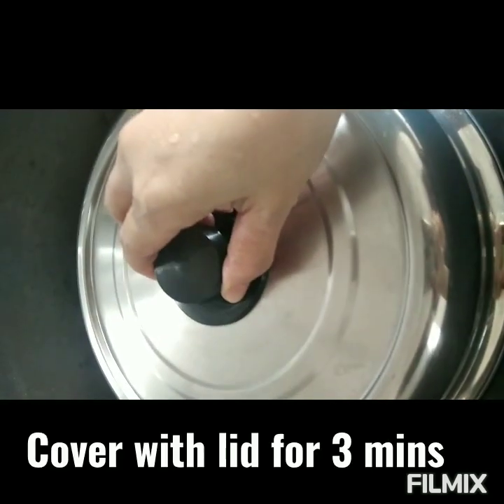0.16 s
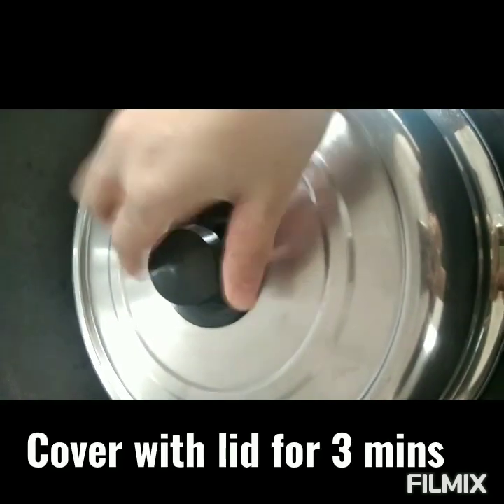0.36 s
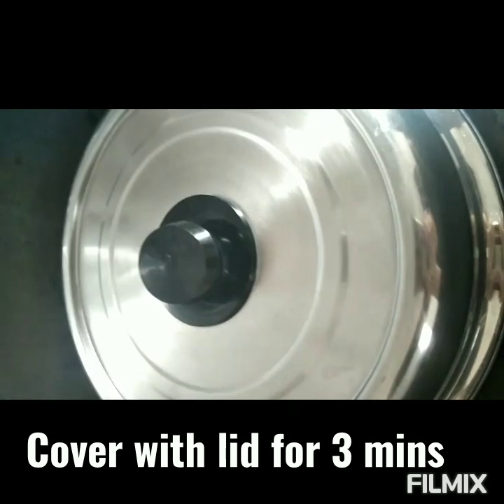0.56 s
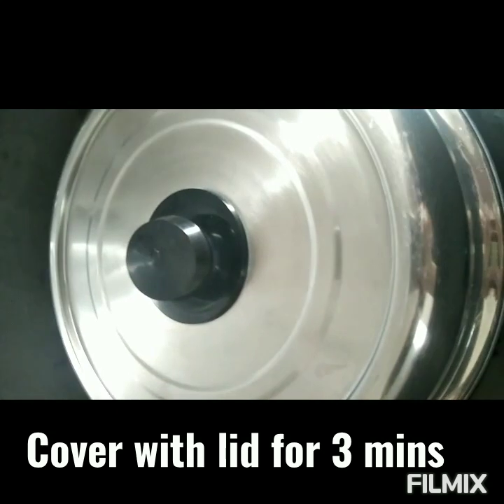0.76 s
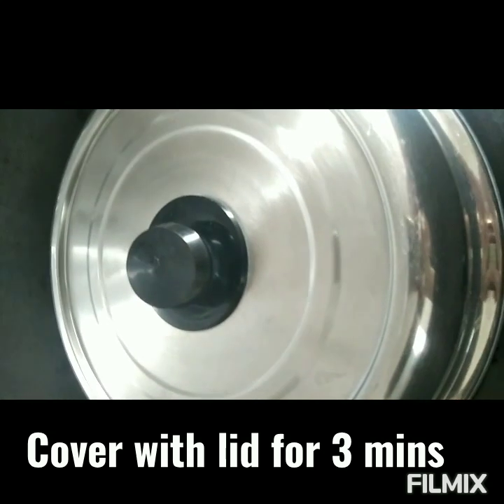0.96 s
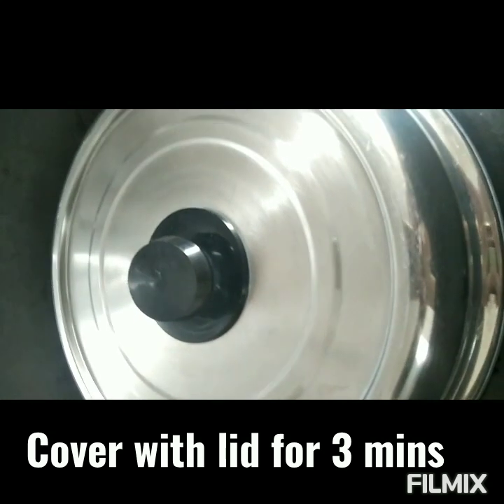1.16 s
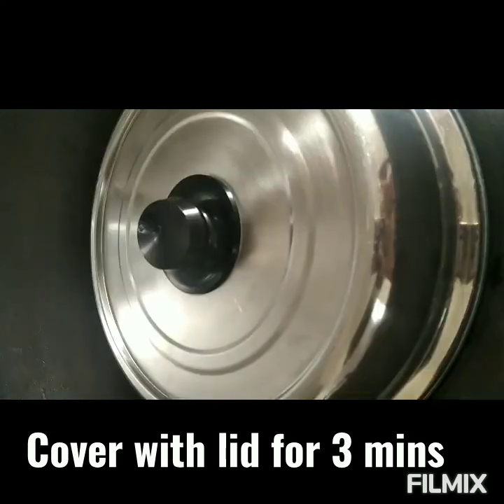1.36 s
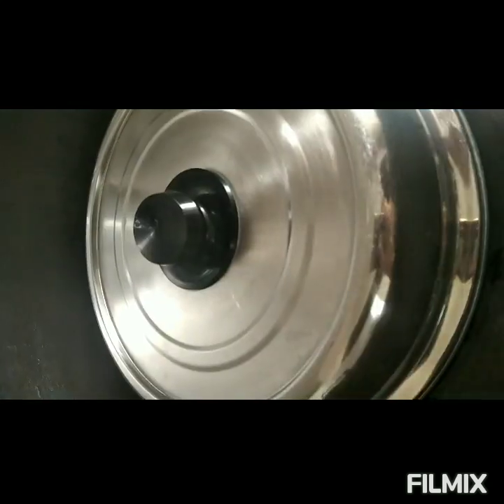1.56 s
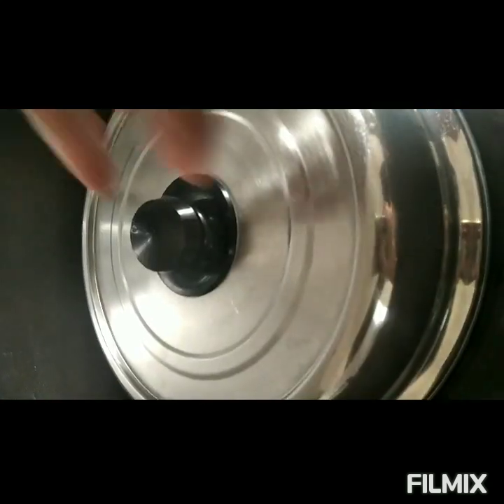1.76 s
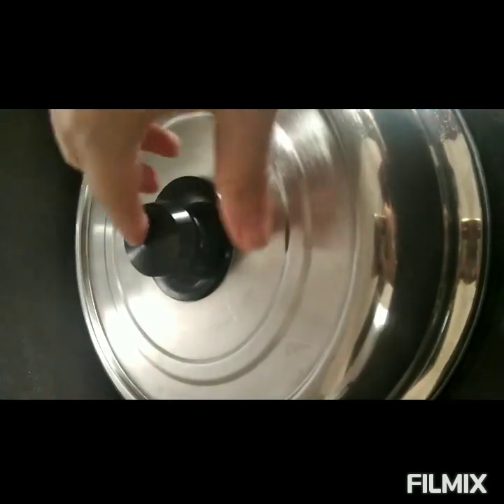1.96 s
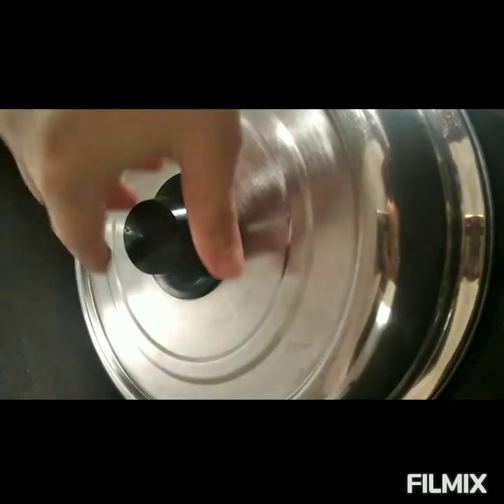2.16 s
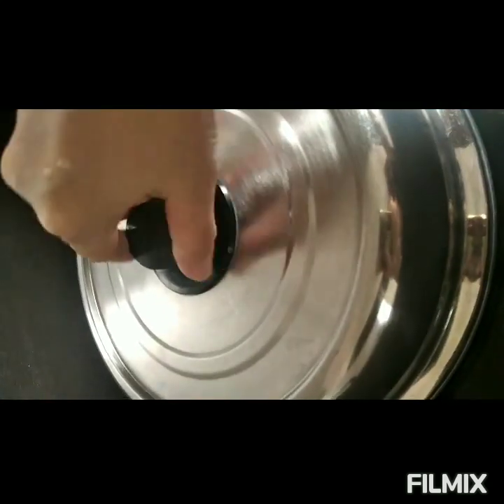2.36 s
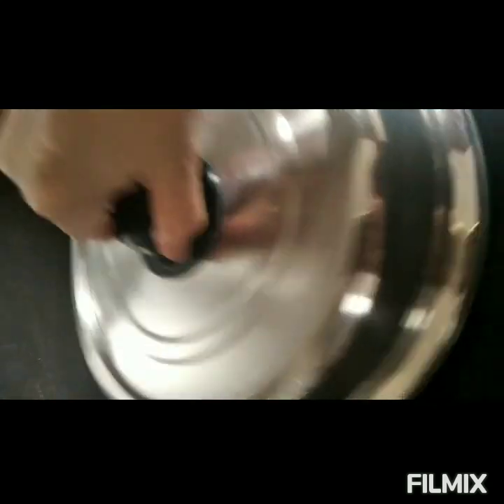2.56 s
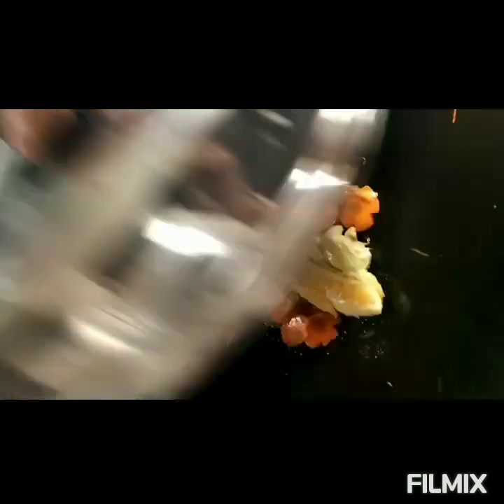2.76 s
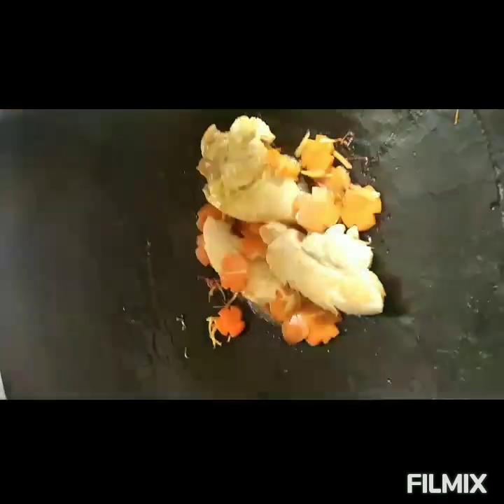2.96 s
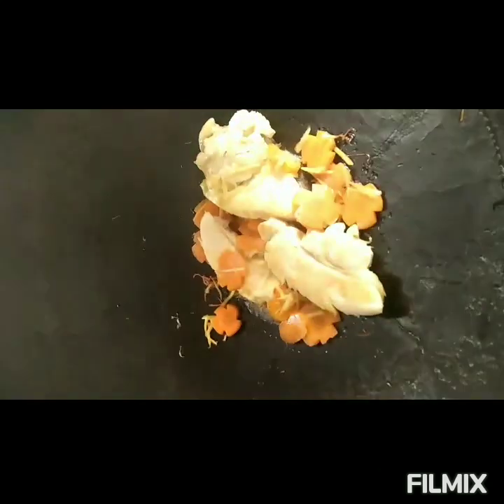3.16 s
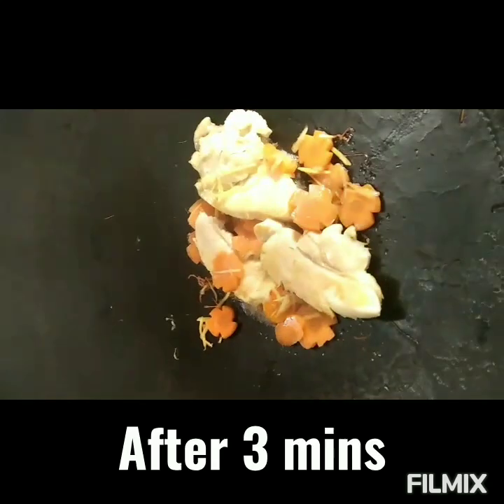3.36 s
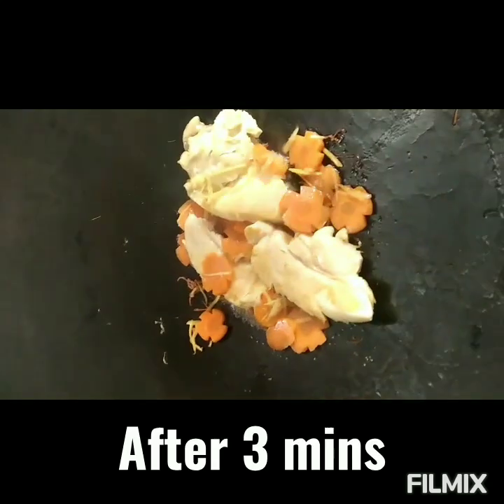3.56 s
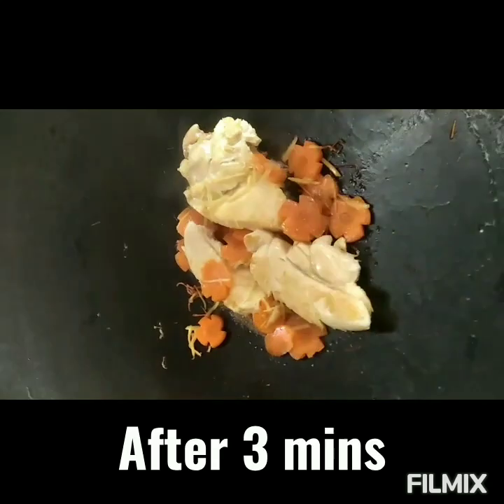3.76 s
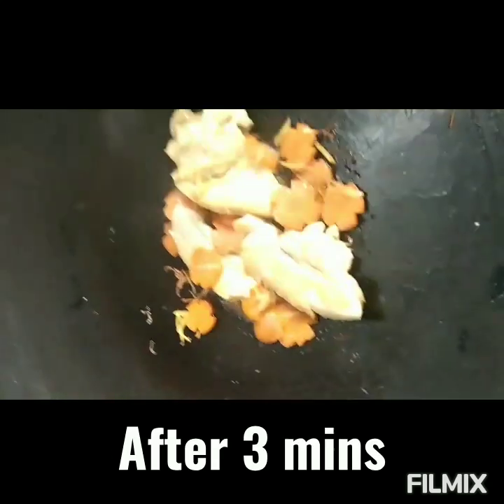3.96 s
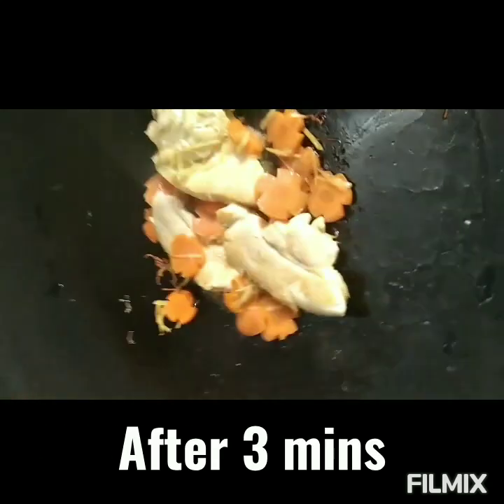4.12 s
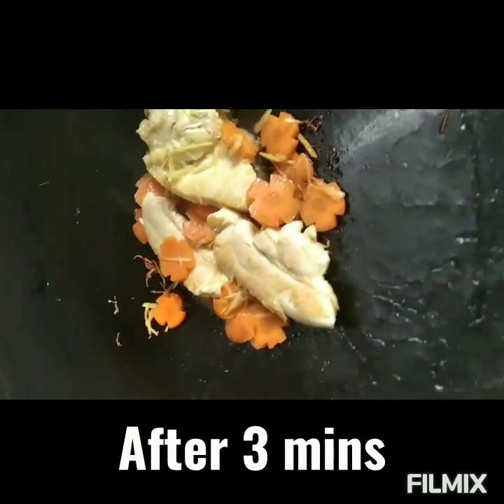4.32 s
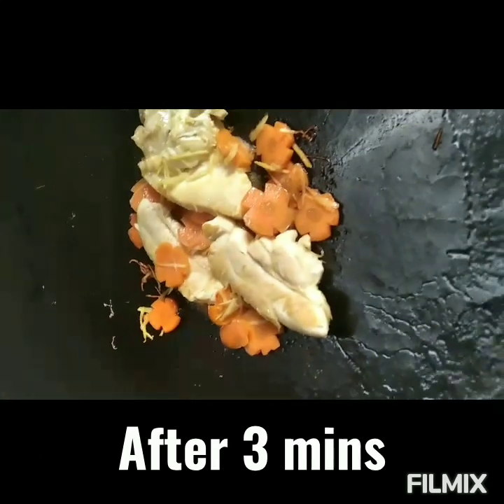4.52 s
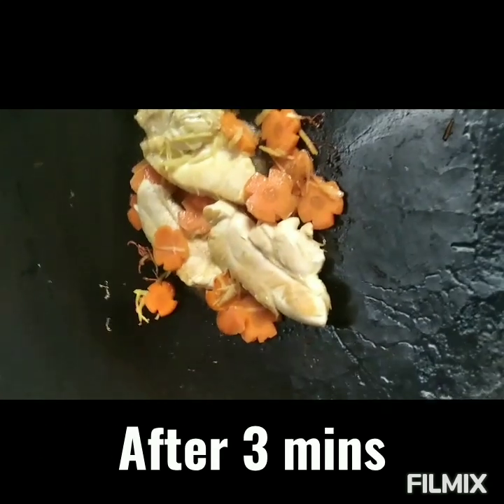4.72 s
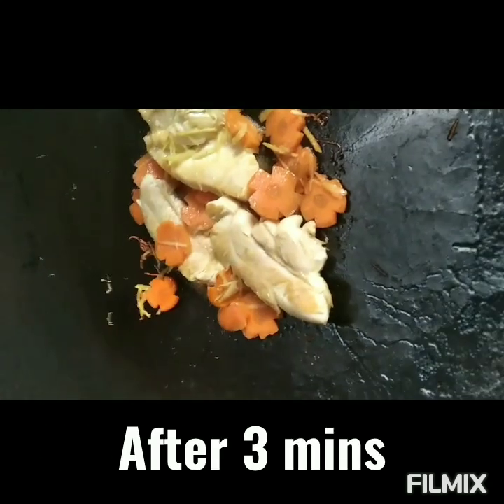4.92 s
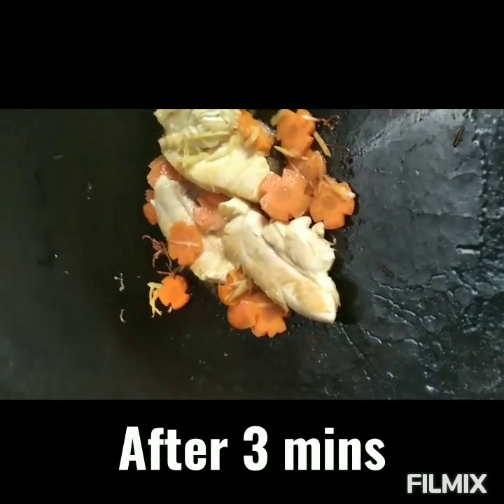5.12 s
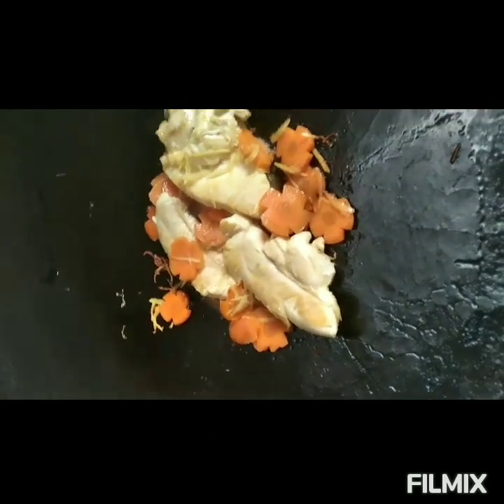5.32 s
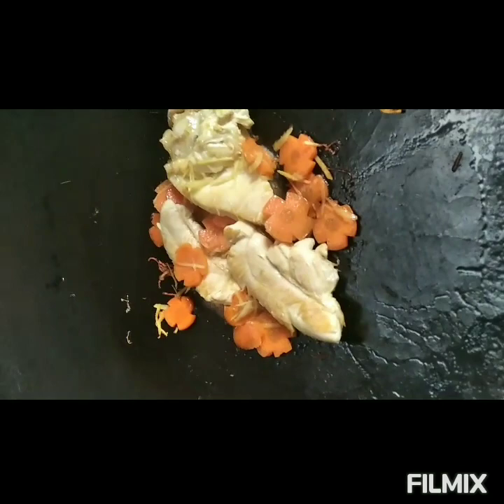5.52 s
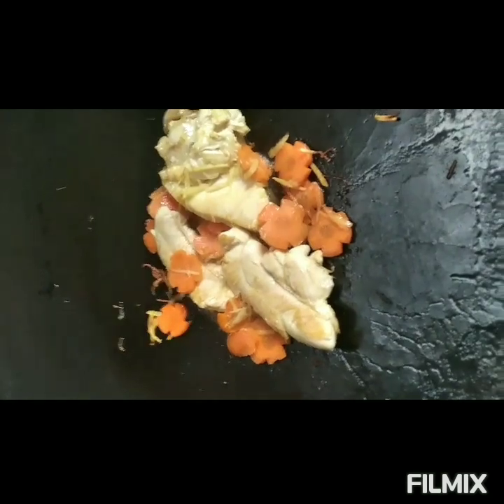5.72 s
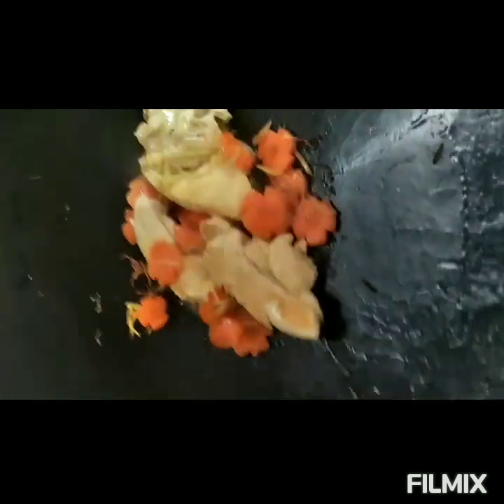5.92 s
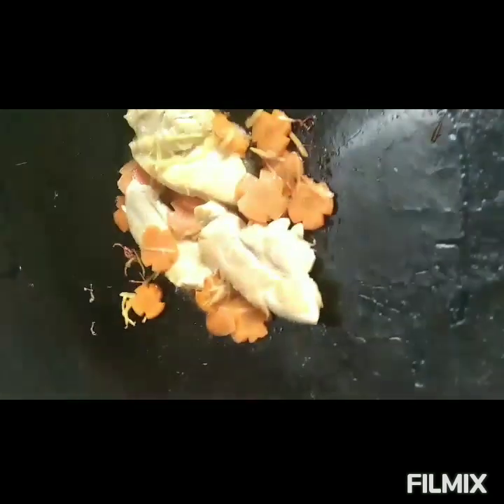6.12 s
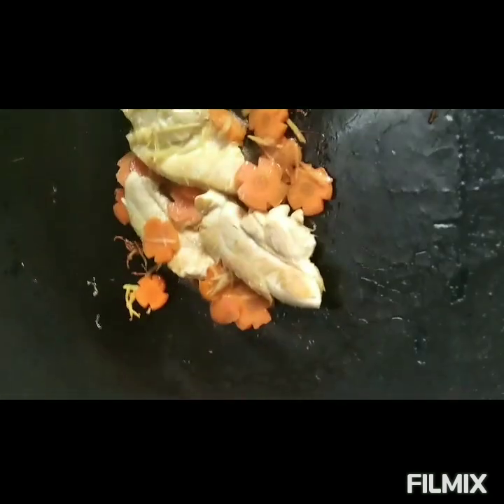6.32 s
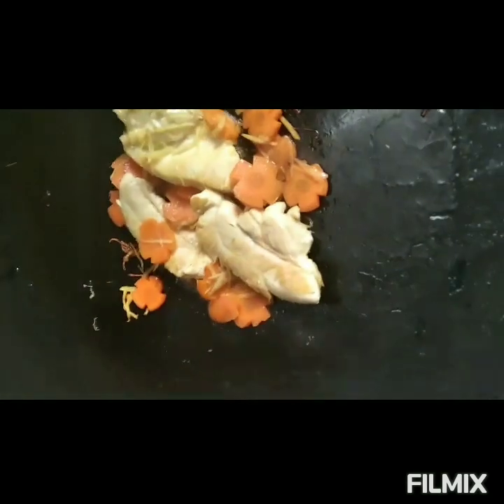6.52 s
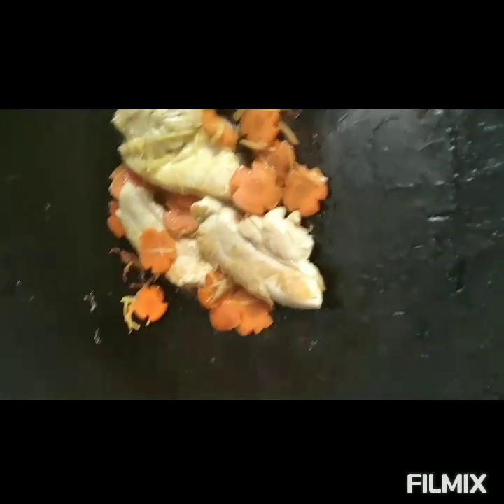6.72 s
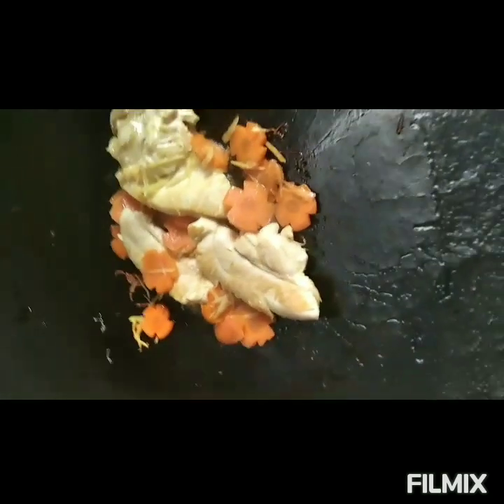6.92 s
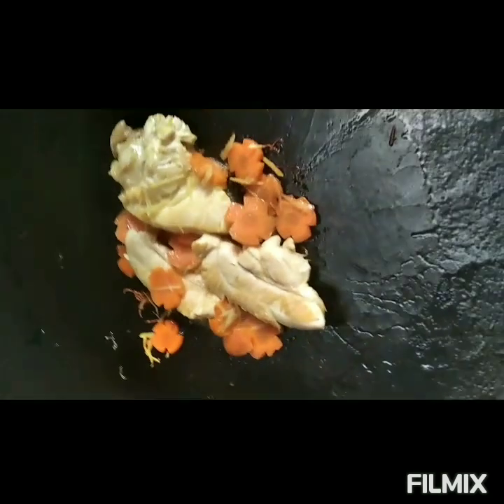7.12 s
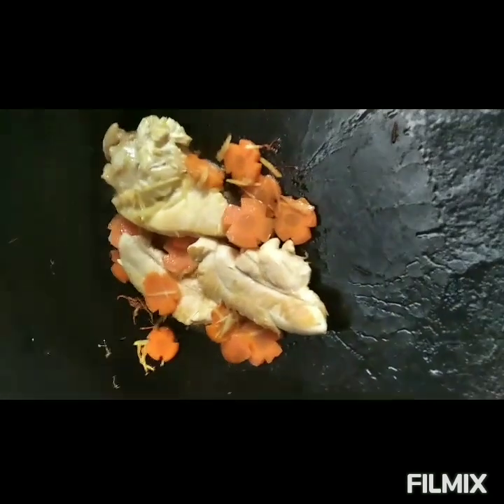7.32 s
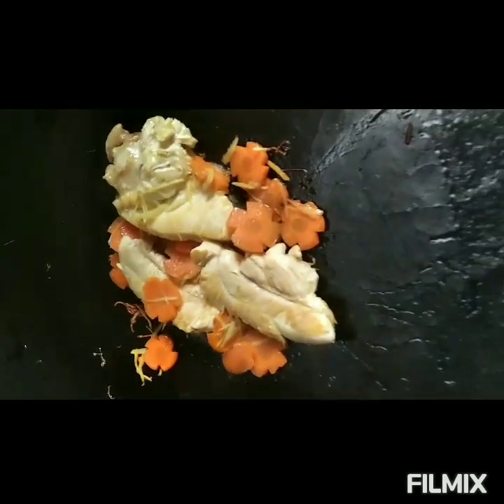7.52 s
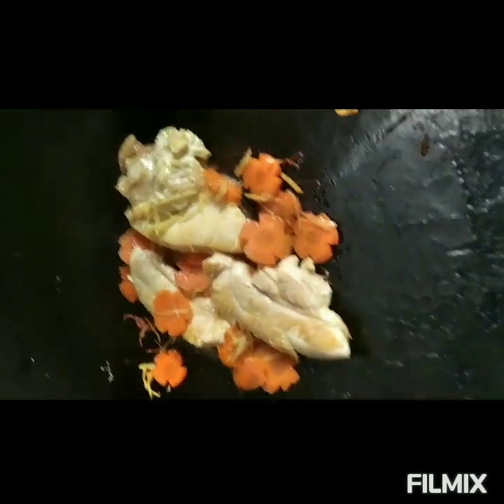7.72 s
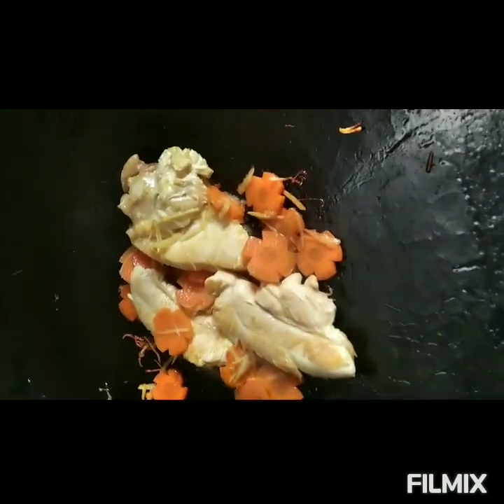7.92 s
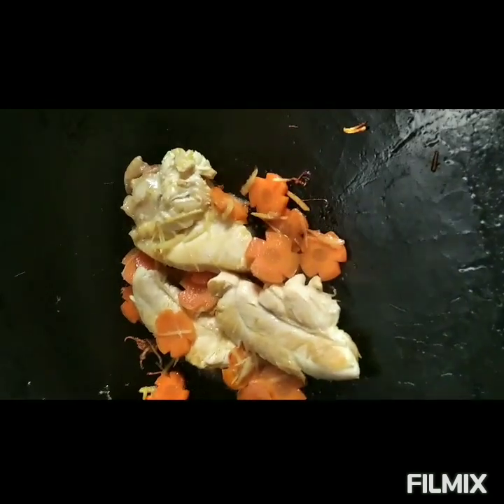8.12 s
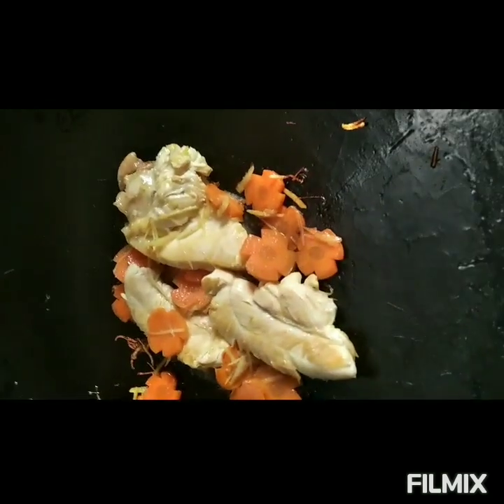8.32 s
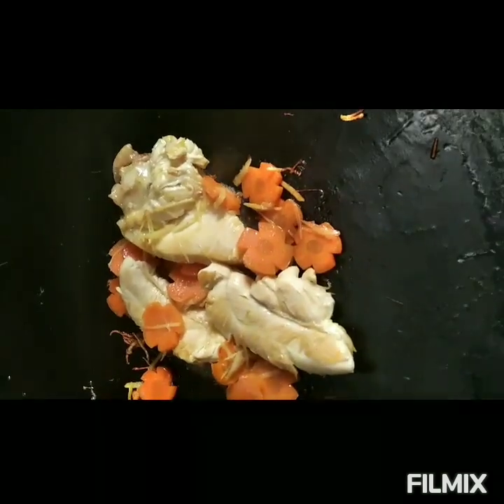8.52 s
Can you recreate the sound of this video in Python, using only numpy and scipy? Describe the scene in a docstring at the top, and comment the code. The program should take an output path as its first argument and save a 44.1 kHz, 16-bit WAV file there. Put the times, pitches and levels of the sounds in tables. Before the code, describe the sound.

Close stereo sound in a small kitchen, with a faint low rush and mains hum behind. From 0 s, food sizzles under a steel lid: hollow, resonant bubbling with leaking hiss, and a soft thump of fingers on the knob at 0.1 s. At about 1.3 s the covered sizzle abruptly changes colour, becoming quieter and duller. Around 2.55 s a hand thumps the knob and the lid lifts; the sizzle opens up bright and full, flaring as water hits oil, with sharp spits and a light knock until about 3.1 s. It eases into steady, crisp frying, with tiny taps at 5.3, 6.3 and 6.7 s and one spit near 5.8 s. At 7.16 s the lid is set down: a rapid metallic chatter on one edge, then the other by 7.27 s, ringing briefly. It slides with low drumming rubs and a scrape until 7.85 s, then a faint scrape and bump at 8.5 s, sizzling throughout.

```python
"""Lidded wok, opened

Chicken and carrots sizzle in a wok under a steel lid, whose knob a hand bumps; then the lid lifts,
water spits in the hot oil and the sizzle opens up. The lid is set down: it clatters, rings and slides.
Sizzle is random bubble bursts, coloured by spectra or by the resonances of the air under the lid.
Blows are damped noise bursts, low thuds and decaying modes; a low rush and a mains hum lie behind."""
import sys
import numpy as np
from scipy import signal
from scipy.fft import rfft, irfft, next_fast_len
from scipy.io import wavfile
from scipy.ndimage import uniform_filter1d, map_coordinates

SR = 44100
rng = np.random.default_rng(int(sys.argv[2]) if len(sys.argv) > 2 else 0)


def wav_out(sig):
    """Save sig, one row per channel (or a flat mono array), as 16-bit PCM at SR to the path in sys.argv[1]."""
    wavfile.write(sys.argv[1], SR, np.round(np.clip(np.atleast_2d(sig).T, -1, 1) * 32767).astype(np.int16))


N = 377937

LIFT_S = 2.556  # the lid leaves the wok
NEAR, FAR = 0, 1  # the two edges of the rim

# level difference of the wok's sound, left minus right: f/Hz, difference/dB
WOK_SIDE = [(300, 21), (600, -9), (800, -6), (1500, -2.5), (2100, 1), (3100, 8.5), (4600, 4), (5000, 2.5),
            (7600, -3), (8600, 2), (9300, 4.5), (11000, 3.5), (14000, 1.5)]
# level difference of the handling and the kitchen, left minus right: f/Hz, difference/dB
TABLE_SIDE = [(100, 12), (280, 13), (400, 7), (650, 3), (2300, 3.5), (4300, 0), (8000, -1), (14000, 1.5)]
# left-right coherence of knocks and modes: f/Hz, coherence (1 = identical)
ALIKE = [(100, 0.17), (300, 0.087), (630, 0.66), (1400, 0.2), (3000, 0.28)]
# dense ringing of the lid's steel, struck at the near and at the far edge: f/Hz, relative level/dB
SHIMMER = [
    [(700, -30), (1300, -3), (2300, 5), (3000, 3), (5000, 12), (7600, 12), (9500, 9), (11000, 2),
     (14400, 2)],
    [(700, -30), (1300, 2), (2300, 13), (3000, 16), (3700, 16.5), (5000, 7), (9500, 5), (11000, -10),
     (14400, -8)],
]


def amp(db):
    """The decibel law: a level in dB as an amplitude ratio."""
    return 10 ** (np.asarray(db) / 20)


def unit(x):
    """Normalisation to an rms amplitude of 1."""
    return x / np.sqrt(np.mean(x ** 2) + 1e-20)


def along(points, hz):
    """Linear interpolation of (f/Hz, value) points on a logarithmic frequency axis."""
    f, value = np.transpose(points)
    return np.interp(np.log(hz + 1), np.log(f), value)


def curves(rows):
    """Linear interpolation in time: one value per sample for each column after t/s."""
    t, *columns = np.transpose(rows)
    return [np.interp(np.arange(N) / SR, t, column) for column in columns]


def wobble(rate):
    """Slow random modulation: a smooth curve through normal draws, rate knots a second."""
    knots = rng.standard_normal(int(N * rate / SR) + 4)
    return map_coordinates(knots, [np.arange(N) * rate / SR])


def filtered(x, response):
    """Linear filtering: the spectrum of x is multiplied by a response of frequency."""
    size = x.shape[-1]
    padded = next_fast_len(size + 8192)
    spectrum = rfft(x, padded) * response(np.fft.rfftfreq(padded, 1 / SR))
    return irfft(spectrum, padded)[..., :size]


def shape(spectrum):
    """Spectral envelope through (f/Hz, level/dB) points, with a second-order roll-off below the first."""
    return lambda hz: amp(along(spectrum, hz)) * np.minimum(hz / spectrum[0][0], 1) ** 2


def placed(pair, response, side):
    """Interaural level difference: a coloured pair of rms 1, leaning left or right by frequency."""
    return unit(filtered(pair, lambda hz: response(hz) * amp(np.outer([1, -1], along(side, hz)) / 2)))


def panned(side_db):
    """Left and right gains whose level difference is side_db."""
    return amp(np.array([[1], [-1]]) * side_db / 2)


def add(out, s, x):
    """Superposition: mix x into out from time s."""
    part = out[:, round(s * SR):][:, :x.shape[1]]
    part += x[:, :part.shape[1]]


def gate(s, width):
    """Smooth switching: a tanh step from 0 to 1 centred on time s."""
    return .5 + .5 * np.tanh((np.arange(N) / SR - s) / width)


def swell(s, length, rise, t60):
    """Growth and exponential decay: a rise over a share of the length, a hold, then a dying away."""
    t = np.arange(N) / SR - s
    return np.clip(t / (rise * length), 0, 1) * amp(-60 * np.maximum(t - length, 0) / t60)


def arch(s, length, power):
    """A transient drive: a half sine raised to a power, from time s to the end of its length."""
    return np.abs(np.sin(np.pi * np.clip((np.arange(N) / SR - s) / length, 0, 1))) ** power


def bursts(rate, clump_db):
    """Shot noise of steam bubbles bursting at random in clumps, with path delays that differ by side."""
    count = int(rate * N / SR)
    at = rng.integers(0, N, count)
    pair = []
    for _ in range(2):
        arrival = at + rng.integers(0, 20, count)
        pair.append(np.bincount(arrival, rng.standard_normal(count), N + 20)[:N])
    clumping = wobble(450) + .6 * wobble(60) + .4 * wobble(14)
    return np.array(pair) * amp(clump_db * clumping)


def covered(hiss_db, hollow_db, hollow, drift=0.027):
    """Cavity resonance: bubbling sounds the air under the lid while hiss leaks past the rim."""
    # hiss past the rim: f/Hz, relative level/dB per Hz
    leak_spectrum = [(700, -51), (1400, -13), (1800, -16), (2100, -2), (3200, -4), (4500, -0.5),
                     (5100, -6.5), (6500, -3.5), (8000, 0), (9300, -1), (11000, -9), (14400, -16)]
    hiss = placed(bursts(rate=16000, clump_db=0.0), shape(leak_spectrum), WOK_SIDE)

    def modes(hz):
        peaks = (amp(2 * db) / (1 + ((hz - centre) / (0.43 * width)) ** 2) ** 2
                 for centre, width, db in hollow)
        return np.sqrt(sum(peaks))

    # a slow random crossfade between two slightly detuned sets of resonances
    lower, upper = (placed(bursts(rate=9000, clump_db=1.0), lambda hz: modes(hz / tune), WOK_SIDE)
                    for tune in (1 - drift, 1 + drift))
    blend = .5 + .5 * np.tanh(wobble(7.3))
    air = np.sqrt(1 - blend) * lower + np.sqrt(blend) * upper
    return amp(hiss_db + 3.5) * hiss + amp(hollow_db) * air


def open_wok(waver_db=0.69):
    """Bubble noise: juices bubble under a finer spray; both surge at the lift and flare where water lands."""
    # bubbling juices: f/Hz, relative level/dB per Hz
    bubbling_spectrum = [(200, -64), (450, -16), (600, -13), (720, -15), (900, -11), (1500, -9.5),
                         (2000, -5.5), (2900, -1), (4000, -0.5), (4680, -0.5), (4900, -9), (5600, -8.5),
                         (7500, -19)]
    # fine spray: f/Hz, relative level/dB per Hz
    spray_spectrum = [(3500, -36), (5200, -11), (6200, -5), (7800, -1.5), (9300, -2), (10200, -6),
                      (11200, -9), (14400, -12)]
    # water off the lid flares up in the oil: t/s, length/s, spray level/dB
    flares = [(2.553, 0.11, -27), (2.78, .02, -28), (2.84, 0.038, -28.5), (2.981, .016, -28),
              (3.27, 0.031, -36)]
    surge_s, opening_s = 0.81, .035
    since = np.maximum(np.arange(N) / SR - LIFT_S, 0)
    surge = np.exp(-(since / surge_s) ** 2)
    opening = 1 - np.exp(-since / opening_s)
    flare = sum(amp(db) * swell(s, length, rise=0.62, t60=0.36) for s, length, db in flares)
    bubbling = placed(bursts(rate=24000, clump_db=0.67), shape(bubbling_spectrum), WOK_SIDE)
    spray = placed(bursts(rate=30000, clump_db=0.17), shape(spray_spectrum), WOK_SIDE)
    # powers add: the settled level with its surge, and the flares
    bubbling_gain = np.hypot(amp(-33 + 2 * surge), amp(-4.5) * flare)
    spray_gain = np.hypot(opening * amp(-33.5 + 2.5 * surge), flare)
    return amp(waver_db * wobble(7)) * (bubbling_gain * bubbling + spray_gain * spray)


def table_noise(size):
    """Partial coherence: stereo noise whose likeness from left to right varies with frequency."""
    def mid_side(hz):
        turn = np.arccos(np.clip(along(ALIKE, hz), -1, 1)) / 2
        return np.array([np.cos(turn), np.sin(turn)])

    mid, side = filtered(rng.standard_normal((2, size)), mid_side)
    return np.array([mid + side, mid - side])


def knock(spectrum, side, t60, tail_db, tail_t60):
    """Impact on a well damped body: a quick noise burst and a weaker, longer answer."""
    t = np.arange(SR // 2) / SR
    onset = 1 - np.exp(-t * SR / 10)
    fade = (amp(-60 * t / t60) + amp(tail_db - 60 * t / tail_t60)) * onset
    return placed(table_noise(len(t)), shape(spectrum), side) * fade


def spits():
    """Explosive boiling: single drops crack in the oil as damped bursts."""
    # a bursting drop: f/Hz, relative level/dB per Hz
    spit_spectrum = [(300, -36), (800, -26), (4000, 15), (9000, -4), (14400, 11)]
    # bursting drops: t/s, relative level/dB
    drops = [(2.589, -32), (2.735, -33), (2.796, -18), (2.822, -16), (2.853, -23), (2.893, -27),
             (2.994, -27), (3.106, -21), (5.773, -27)]
    out = np.zeros((2, N))
    for s, db in drops:
        add(out, s, amp(db + 2.5) * knock(spit_spectrum, WOK_SIDE, t60=0.0057, tail_db=-11, tail_t60=0.078))
    return out


def thud(hz, cycles):
    """Heavily damped oscillation: a low note that swells and dies within a few cycles."""
    t = np.arange(SR // 8) / SR
    age = 2 * hz * t / cycles
    return age * np.exp(1 - age) * np.sin(2 * np.pi * hz * t) * panned(along(TABLE_SIDE, hz))


def ring(blows, rub, hz, struck_db, rubbed_db, t60):
    """Modal energy balance: one mode stores the energy of blows and rubbing, and loses it exponentially."""
    keep = np.exp(-2 * np.log(1000) / (t60 * SR))
    fed = (amp(struck_db) * blows) ** 2 + (1 - keep) * (amp(rubbed_db) * rub) ** 2
    energy = signal.lfilter([1], [1, -keep], fed)
    # fresh energy jolts the phase, so the line is fuzzy while driven and clean as it fades
    jolts = 0.5 * np.sqrt(fed / (energy + 1e-12)) * rng.standard_normal(len(fed))
    # the swing needs about a cycle to follow a blow
    follow = np.exp(-2 * hz / SR)
    driven = np.sqrt(energy) * np.exp(1j * np.cumsum(jolts))
    swing = signal.lfilter([1 - follow], [1, -follow], driven)
    phase = 2 * np.pi * hz * np.arange(len(fed)) / SR
    # the phase lag between the sides gives their coherence
    lag = np.arccos(np.clip(along(ALIKE, hz), -1, 1)) * rng.choice([-1, 1])
    pair = (swing * np.exp(1j * np.array([phase, phase + lag]))).imag
    return pair * panned(along(TABLE_SIDE, hz))


def sheet(spectrum, scatter_db=1.5):
    """High modal density: the many close, weak modes of thin steel, with separate phases on each side."""
    t = np.arange(SR // 5) / SR
    hz = 2500 + 79 * (np.arange(150) + rng.random(150))
    gain = amp(along(spectrum, hz) + scatter_db * rng.standard_normal(len(hz)))
    t60 = 0.22 * (5000 / hz) ** 0.1  # seconds; higher modes die sooner
    swing = np.exp((2j * np.pi * hz - np.log(1000) / t60)[:, None] * t)
    phases = np.exp(2j * np.pi * rng.random((2, len(hz))))
    return ((gain * phases) @ swing).imag / np.linalg.norm(gain)


def rim_contacts(contacts):
    """Repeated impact: each contact thuds, knocks the worktop and cracks; its blows are kept for each edge."""
    # the worktop under the near and the far edge: f/Hz, relative level/dB per Hz
    worktop_spectra = [
        [(50, -45), (190, -28), (260, -3), (365, 11), (450, -22), (575, 8), (700, -5), (820, -7), (1300, -8),
         (3000, -35)],
        [(50, -45), (190, -22), (260, -9), (365, 3), (540, 10), (690, -1), (900, 1), (1300, -5.5), (3000, -33)],
    ]
    thud_hz = (612, 510)  # mean pitch at the near and far edge
    out, soft, hard = np.zeros((2, N)), np.zeros((2, N)), np.zeros((2, N))
    for s, edge, knock_db, ring_db in contacts:
        soft[edge, round(s * SR)] = amp(knock_db)
        hard[edge, round(s * SR)] = amp(ring_db)
        pitch = thud_hz[edge] * (1 + 0.046 * rng.standard_normal())
        top = knock(worktop_spectra[edge], TABLE_SIDE, t60=0.053, tail_db=-12, tail_t60=0.16)
        crack = knock(SHIMMER[edge], TABLE_SIDE, t60=0.012, tail_db=-5, tail_t60=0.1)
        add(out, s, amp(knock_db + 0.5) * thud(pitch, cycles=2.6))
        add(out, s, amp(knock_db - 1) * top)
        add(out, s, amp(ring_db + 2.5) * crack)
    return out, soft, hard


def lid_modes(soft, hard, rubs, grip_hz, start):
    """Modal superposition: each edge rings the lid's modes in its own mix, and rubbing feeds them too."""
    # modes of the steel lid: f/Hz, near-edge level/dB, far-edge level/dB, rubbed level/dB, t60/s
    lid = [(262, -23, -21, -26, .25), (346, -17, -20, -23, .25), (383, -11, -11, -19, .25),
           (458, -23, -9, -14, .3), (508, -19, -12, -12, .45), (576, -3, -13, -16, .22),
           (629, -4.5, -19, -18, .2), (682, -4, -19, -11, .2), (890, -18, -15, -17, .3),
           (1233, -20, -25, -20, .3), (1422, -34, -28, -22, .7), (1443, -29, -14.5, -14, 1.45),
           (1653, -30, -27, -17, .3), (1755, -26, -19, -19, .5), (2025, -12.5, -14, -26, .45),
           (2317, -12, -8, -25, .36), (2690, -12, -19, -26, .25), (2837, -19, -8.5, -24, .3),
           (2890, -13.5, -9, -23, .33), (3004, -17, -12, -24, .25), (3222, -17, -18, -26, .3),
           (3548, -22, -12, -25, .3), (4110, -12, -22, -30, .2), (4532, -6, -26, -32, .33),
           (4658, -11, -20, -30, .25), (4780, -18, -13, -26, .5), (4882, -11, -28, -34, .2),
           (5118, -6.5, -11, -34, .33), (5278, -6, -22, -34, .24), (5564, -20, -20, -34, .4),
           (5946, -11.5, -21, -34, .3), (6460, -16, -18, -34, .35), (6794, -15, -26, -36, .22),
           (8463, -15, -24, -36, .22), (9377, -10, -20, -34, .28), (9940, -12, -24, -36, .22)]
    grip_db, grip_octaves = 12, 0.15  # modes near the pitch that the grip favours are driven harder
    out = np.zeros((2, N))
    for hz, near_db, far_db, rubbed_db, t60 in lid:
        blows = soft if hz < 1900 else hard
        grip = amp(grip_db * np.exp(-(np.log2(hz / grip_hz) / grip_octaves) ** 2))
        struck = amp([near_db, far_db]) @ blows[:, start:]
        add(out, start / SR, ring(struck, grip @ rubs[:, start:], hz, 0, rubbed_db, t60))
    sheet_db = (1, -1.5)
    for edge in (NEAR, FAR):
        shimmer = signal.fftconvolve(hard[edge, start:][None], sheet(SHIMMER[edge]), axes=1)
        add(out, start / SR, amp(sheet_db[edge]) * shimmer)
    return out


def friction(slips, rubs):
    """Friction noise: the sliding lid rubs the worktop and its rim scrapes."""
    # rubbing: f/Hz, relative level/dB per Hz
    rub_spectrum = [(50, -30), (120, 6.5), (190, -9.5), (280, -7), (380, -9), (490, -4), (680, 1), (850, 3),
                    (1200, -4), (1750, -1), (3000, -8), (8000, -43)]
    # scraping: f/Hz, relative level/dB per Hz
    scrape_spectrum = [(900, -24), (1230, -3), (1420, -18), (1655, 4), (1850, -9), (2600, -16), (6000, -28)]
    # scrapes of the rim: t/s, length/s, relative level/dB
    scrapes = [(7.71, 0.074, -36.5), (8.509, .04, -38)]
    out = amp(-1.5) * rubs.sum(axis=0) * placed(table_noise(N), shape(rub_spectrum), TABLE_SIDE)
    for s, length, db in scrapes:
        size = round(length * SR)
        noise = placed(table_noise(size), shape(scrape_spectrum), TABLE_SIDE)
        add(out, s, amp(db) * slips[:size] * signal.windows.tukey(size) * noise)
    return out


def dome(shoves):
    """Forced vibration: the lid's dome drums in each shove, its pitch wavering about 125.6 Hz."""
    drumming = sum(amp(db) * arch(s, length, 1.8) for s, length, _, db, _ in shoves)
    phase = 2 * np.pi * np.cumsum(125.6 + 2.8 * wobble(30)) / SR
    return drumming * amp(1.2 * wobble(45)) * np.sin(phase) * panned(13.5)


def lid_down():
    """Impact and stick-slip: one edge chatters on the worktop, then the other, and the lid rubs along."""
    # the rim clatters, then bumps as it slides: t/s, edge, relative knock level/dB, relative ring level/dB
    contacts = [(7.160, NEAR, -41, -37), (7.170, NEAR, -22, -19), (7.175, NEAR, -23.5, -20),
                (7.187, NEAR, -23.5, -21), (7.199, NEAR, -25, -21), (7.210, NEAR, -23, -25),
                (7.225, NEAR, -24, -28), (7.243, NEAR, -32, -27), (7.258, FAR, -31, -25),
                (7.271, FAR, -20, -19), (7.280, FAR, -26, -19.5), (7.295, FAR, -24, -23),
                (7.309, FAR, -25, -28), (7.320, FAR, -26, -30), (7.331, FAR, -22, -26),
                (7.350, FAR, -27, -33), (7.368, FAR, -31, -36), (7.386, FAR, -26, -33),
                (7.407, FAR, -29, -41), (7.512, FAR, -39, -42), (7.549, FAR, -35, -46),
                (7.613, NEAR, -38, -46), (7.655, NEAR, -40, -48), (7.729, FAR, -31, -38),
                (7.955, FAR, -47, -56), (8.090, FAR, -47, -56), (8.527, FAR, -43, -41)]
    # the hand shoves the lid: t/s, length/s, relative rub level/dB, relative dome level/dB, favoured f/Hz
    shoves = [(7.16, .18, -35, -36, 580), (7.27, .18, -35, -28.5, 510), (7.485, .125, -37, -37.5, 460),
              (7.6, .105, -37, -32, 690), (7.706, .15, -35, -27.5, 380), (7.76, .12, -42, -46, 510),
              (7.9, .31, -56, -55, 510), (8.49, .13, -42, -50, 510)]
    slip_rate, slip_db = 220, 3  # knots per second; depth in dB per unit of wobble
    slips = unit(amp(slip_db * (wobble(slip_rate) + .6 * wobble(slip_rate / 5))))
    rubs = slips * np.array([amp(db) * arch(s, length, 0.6) for s, length, db, _, _ in shoves])
    grip_hz = np.array(shoves)[:, -1]
    start = round(contacts[0][0] * SR)
    impacts, soft, hard = rim_contacts(contacts)
    return impacts + lid_modes(soft, hard, rubs, grip_hz, start) + friction(slips, rubs) + dome(shoves)


def knob():
    """Soft impact: fingers thump the lid, whose modes are damped by its seat; nudges feed them too."""
    # the knob struck by the hand: f/Hz, relative level/dB per Hz
    knob_spectrum = [(60, -45), (170, -28), (240, 7), (340, -3.5), (450, 0), (540, 8.5), (620, 3),
                     (760, -47), (1500, -20), (2600, -9.5), (5000, -36)]
    # the hand meets the knob: t/s, relative level/dB
    bumps = [(.125, -25), (2.547, -23.5), (2.557, -34), (2.566, -31.5)]
    # the lid is nudged on its seat: t/s, length/s, relative level/dB
    nudges = [(0, 0.067, -44), (.43, 0.12, -51.5)]
    # modes of the seated lid: f/Hz, struck level/dB (rubbed: half this dB), t60/s
    seated = [(245, -19.5, 0.51), (358, -15.5, 0.42), (463, -21, 0.18), (550, -10, 0.12), (566, -8, 0.44)]
    out, blows = np.zeros((2, N)), np.zeros((1, N))
    for s, db in bumps:
        add(out, s, amp(db + 0.5) * thud(430, cycles=1.45))
        add(out, s, amp(db - 3.5) * knock(knob_spectrum, TABLE_SIDE, t60=0.1, tail_db=-9.5, tail_t60=0.81))
        add(blows, s, amp([[db]]))
    nudge = amp(3.2 * wobble(43)) * sum(amp(db) * arch(s, length, 0.6) for s, length, db in nudges)
    return out + sum(ring(blows[0], nudge, hz, db, db / 2, t60) for hz, db, t60 in seated)


def taps():
    """Impulse response: light taps knock the wok and sound its lowest clear mode."""
    # the tapped wok: f/Hz, relative level/dB per Hz
    wok_spectrum = [(250, -10), (480, -2), (800, 0.5), (1100, -4.5), (1700, -6.5), (3000, -7), (6000, -18)]
    # light taps: t/s, knock level/dB, ring level/dB
    tap_times = [(2.822, -25.5, -49), (5.309, -58, -45), (6.307, -49, -37), (6.676, -43, -38.5)]
    out, blows = np.zeros((2, N)), np.zeros((1, N))
    for s, knock_db, ring_db in tap_times:
        add(out, s, amp(knock_db) * knock(wok_spectrum, TABLE_SIDE, t60=0.036, tail_db=-9.5, tail_t60=0.43))
        add(blows, s, amp([[ring_db]]))
    return out + ring(blows[0], 0, 552, 0, 0, t60=0.23)


def room(x):
    """Reverberation: the kitchen answers with decaying noise, each frequency dying at its own speed."""
    # reverberation time: f/Hz, t60/s
    room_t60 = [(150, 0.81), (500, 0.19), (3000, 0.64), (12000, 0.08)]
    hz, t, z = signal.stft(rng.standard_normal((2, SR // 2)), SR, nperseg=256)
    decay = amp(-60 * t / along(room_t60, hz)[:, None])
    tail = signal.istft(z * decay, SR, nperseg=256)[1]
    return signal.fftconvolve(x, tail / np.linalg.norm(tail[0]), axes=1)[:, :N]


def kitchen():
    """Broadband and tonal background: a low rush with random level changes and a faint mains hum."""
    # the low rush: f/Hz, relative level/dB per Hz
    rush_spectrum = [(20, -37), (50, -21), (90, -4), (122, 1.5), (165, -7), (260, -5.5), (400, -3),
                     (580, -12.5), (750, -13.5), (1500, -16)]
    # course of the rush: t/s, level/dB before its random changes
    rush_course = [(0, -47.5), (0.6, -55), (1.1, -51.5), (3.05, -49.5), (3.3, -58.5), (5.6, -55.5),
                   (8.5, -58.5)]
    level_db, = curves(rush_course)
    waver = amp(1.5 * wobble(9) + 2 * wobble(22))
    rush = amp(level_db) * placed(table_noise(N), shape(rush_spectrum), TABLE_SIDE)
    hum_tone = np.sin(2 * np.pi * 120 * np.arange(N) / SR)
    hum = amp(-68.5 + 2.3 * wobble(2.43)) * hum_tone * amp([[3], [-10]])  # stronger on the left
    return waver * (rush + hum)


def scene():
    """Superposition: the covered wok from two spots in turn, then the open wok, with the lid's handling."""
    # air resonances under the lid, first spot: f/Hz, relative width/Hz, relative level/dB
    hollow_near = [(581, 30, -10.5), (934, 42, 2), (1012, 170, -5.5), (1585, 57, 1), (2174, 37, 0.5),
                   (2670, 34, -0.5), (3340, 78, 2.5), (3660, 28, -0.5), (3910, 89, 2), (4230, 47, 3.5)]
    # air resonances under the lid, second spot: f/Hz, relative width/Hz, relative level/dB
    hollow_far = [(615, 140, -11.5), (1132, 66, -1.5), (1244, 200, -6), (1964, 96, -2), (2370, 690, -5),
                  (2675, 107, 3), (3360, 270, -2.5), (4200, 460, -3.5)]
    # hiss past the rim while the lid settles, from close by: t/s, relative level/dB
    leak_near = [(0.0, -34.5), (0.238, -41), (0.72, -38.5), (0.73, -40), (1.308, -39.5), (1.32, -37)]
    moved, lifted = gate(1.322, 0.0068), gate(LIFT_S, 0.01)
    leak_near_db, = curves(leak_near)
    near = covered(leak_near_db, -42, hollow_near)
    far = covered(-47, -43, hollow_far)
    under_lid = (1 - moved) * near + moved * far
    wok = (1 - lifted) * under_lid + lifted * open_wok()
    handling = knob() + spits() + taps() + lid_down()
    return wok + handling + amp(-15) * room(handling) + kitchen()


def record(dry):
    """Noise gating and band limiting: each low band shuts when faint; the top is cut off steeply."""
    # bands of the gate: low f/Hz, high f/Hz, threshold level/dB
    gate_bands = [(1, 185, -68), (185, 410, -66.5), (410, 800, -64)]
    depth_db, window_s, top_hz = -30, .03, 14350
    gated = dry
    for low_hz, high_hz, threshold_db in gate_bands:
        band = filtered(dry, lambda hz: 1 / (1 + (hz / high_hz) ** 16) - 1 / (1 + (hz / low_hz) ** 16))
        power = np.abs(uniform_filter1d(np.mean(band ** 2, axis=0), int(window_s * SR)))
        faint = 1 / (1 + (power / amp(threshold_db) ** 2) ** 4)
        shut = uniform_filter1d(faint, int(window_s * SR / 2))
        gated = gated - (1 - amp(depth_db * shut)) * band
    return filtered(gated, lambda hz: 1 / (1 + (hz / top_hz) ** 400))


dry = scene()
out = record(dry)
wav_out(out)
```